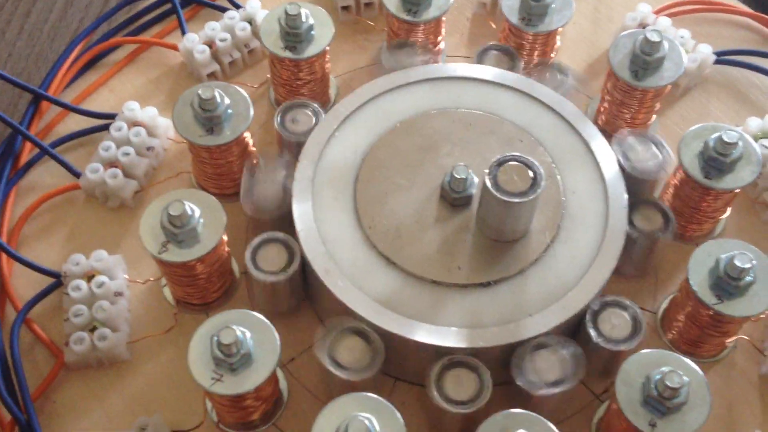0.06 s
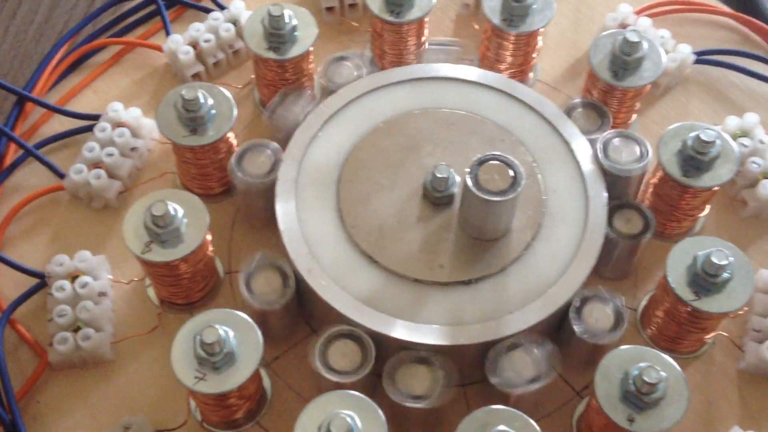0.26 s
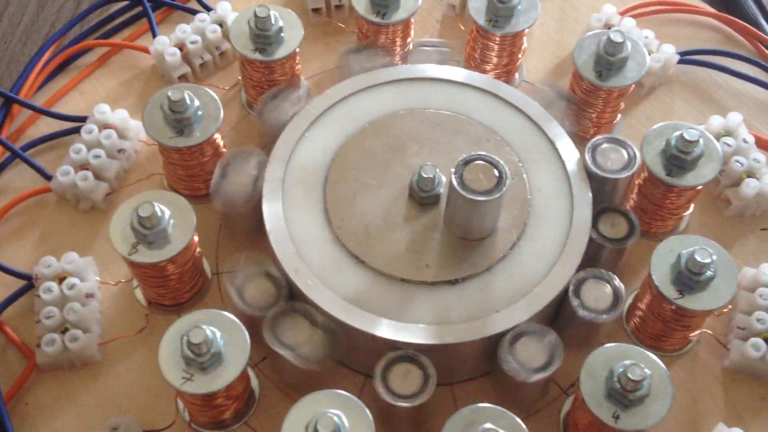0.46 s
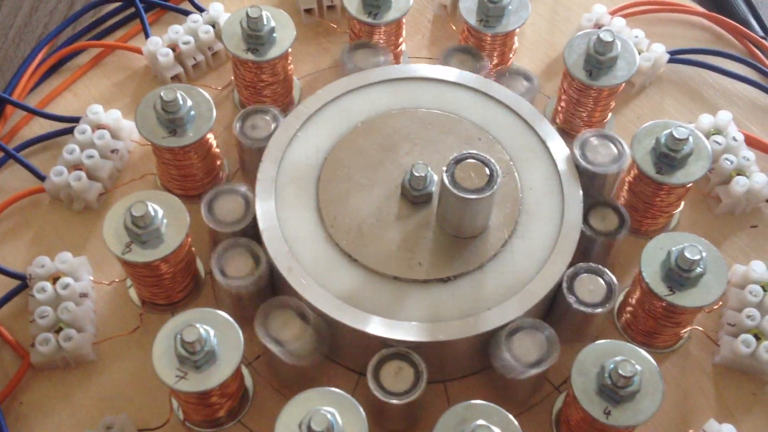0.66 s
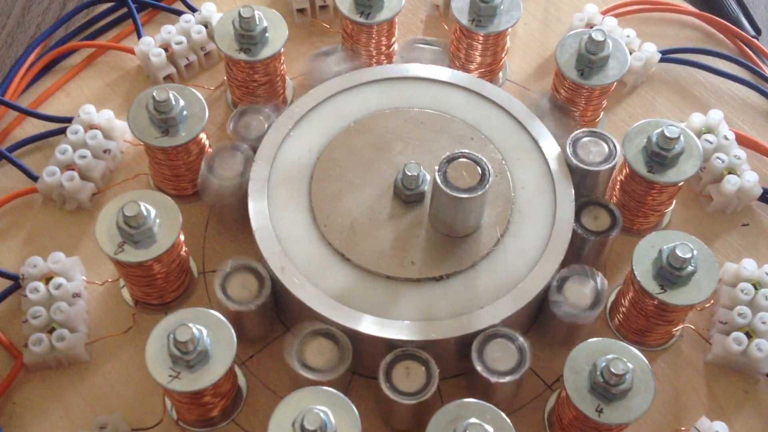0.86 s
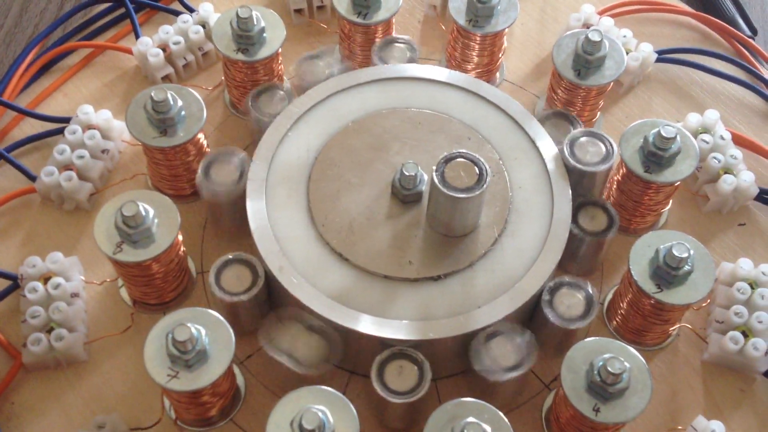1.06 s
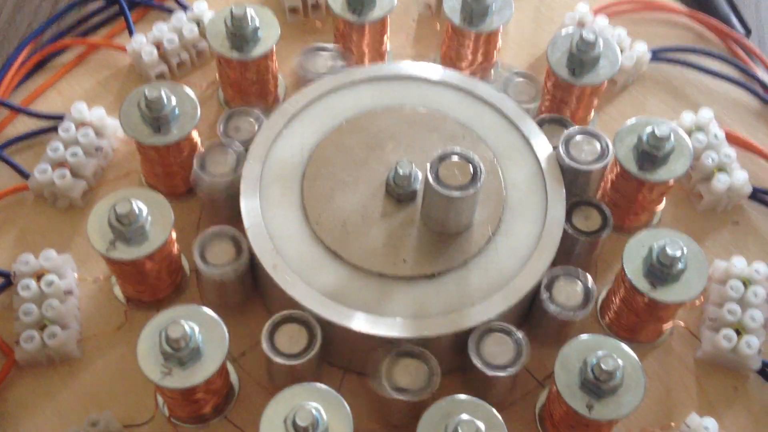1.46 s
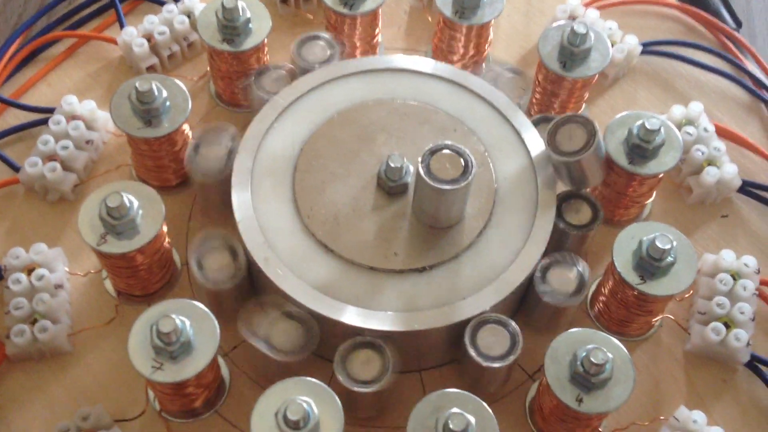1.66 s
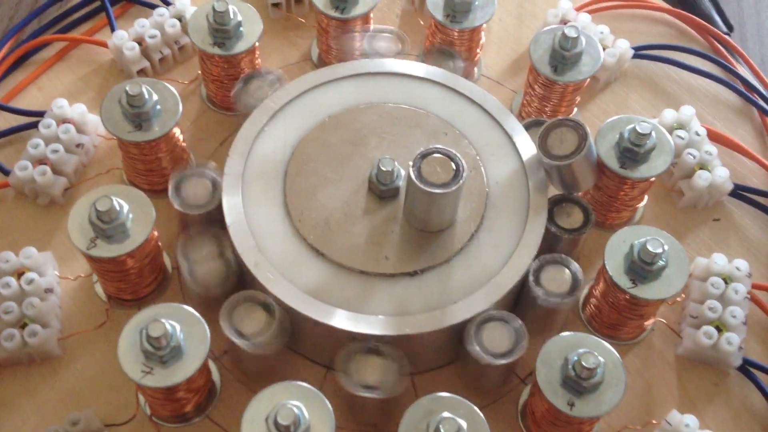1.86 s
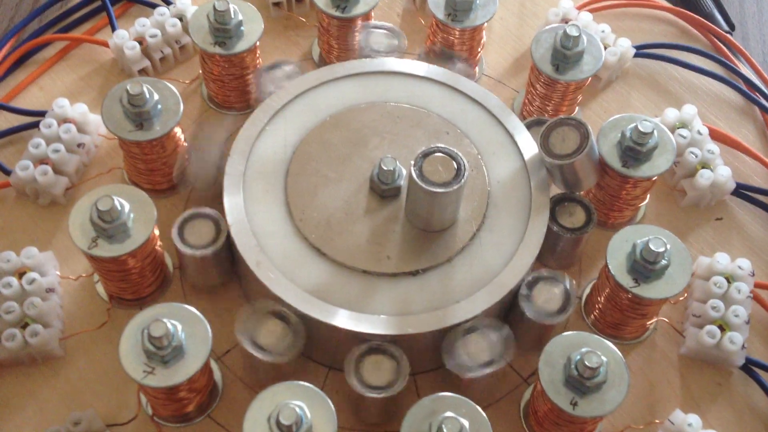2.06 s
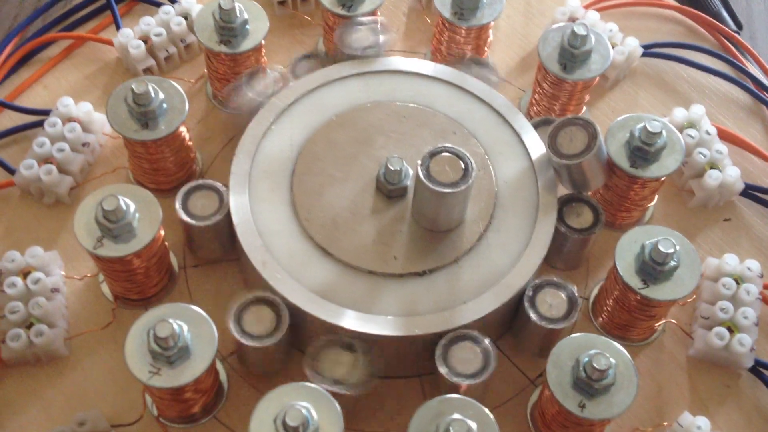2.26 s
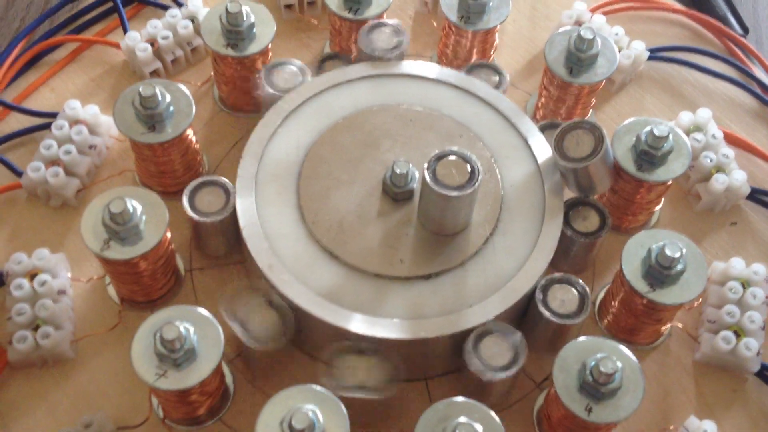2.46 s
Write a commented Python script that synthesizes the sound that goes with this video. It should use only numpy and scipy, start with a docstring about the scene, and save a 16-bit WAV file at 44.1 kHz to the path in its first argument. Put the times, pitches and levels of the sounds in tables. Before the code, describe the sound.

Small steel rollers click and rattle rapidly around a metal disc over a faint hum.

```python
"""Magnetic steel rollers run around a metal disc on a wooden table, close to the microphone.
They snap against the disc and each other in short bright clicks with a chatter of micro-bounces,
now and then knock the board, and rumble and hiss as they roll. A small live room answers every click.
Underneath, a faint hum comes and goes, and a soft low rumble swells near the end."""
import sys
import numpy as np
from scipy import signal
from scipy.fft import rfft, irfft
from scipy.io import wavfile
from scipy.ndimage import uniform_filter1d

SR = 44100
rng = np.random.default_rng(int(sys.argv[2]) if len(sys.argv) > 2 else 0)


def bounce(signal):
    """Save signal as a 16-bit WAV file at the path given by the first command-line argument."""
    frames = np.transpose(np.atleast_2d(signal))
    limited = np.clip(frames, -1, 1)
    pcm = np.round(limited * 32767).astype(np.int16)
    wavfile.write(sys.argv[1], SR, pcm)


N = 114660

SNAP_HZ, CLACK_HZ = 6374, 3565  # pitches at which the roller modes are listed


def rollers():
    """Each roller grazes, then strikes; faint ticks fall between. Gives direct sound and room send."""
    # strikes: t/s, snap level/dB, knock, clack and ping re snap/dB, snap f/Hz, clack f/Hz
    clicks = [(0.0172, -14.5, -5.5, 0, -24, 7650, 3820), (0.0197, -20.5, -12, 6, -11, 6200, 4050),
              (0.0244, -17.5, -5, -2, -11, 6600, 3860), (0.1128, -31, 4, 3, -14, 6400, 3500),
              (0.1551, -29, -4, 7.5, -3, 5400, 3970), (0.248, -7, -10.5, -1, -12, 6250, 3840),
              (0.3215, -30, 0, 2, -14, 6400, 3500), (0.3445, -30, 1, 1, -16, 6400, 3500),
              (0.3992, -2, -14, -4, -11.5, 5950, 3560), (0.476, -9.5, -14.5, -4.5, -16, 7000, 4260),
              (0.5488, -0.5, -36, -5, -24, 6100, 3390), (0.5534, 4, -32, -15, -30, 6240, 4680),
              (0.627, -6, -16.5, -8, -39, 6900, 4220), (0.7035, 0.5, -21, -8, -26, 6280, 3540),
              (0.7859, -5.5, -19, -9.5, -39, 6870, 4000), (0.8596, 4, -20, -11.5, -7.5, 6200, 3610),
              (0.9437, -8, -7.5, -6.5, -22, 6970, 4350), (1.0212, 3, -15, -8, -14, 6240, 3330),
              (1.097, -12, -10, -6, -20, 7000, 3800), (1.177, 3, -22, -6, -14.5, 6230, 3480),
              (1.2447, -15.5, -27, -6, -10, 5600, 2800), (1.3366, 0, -9.5, -6.5, -4.5, 6170, 4050),
              (1.3935, -15.5, 0, -2, -2.5, 5860, 3400), (1.4396, 1.5, -23, -7.5, -42, 6620, 4300),
              (1.5239, -23, 7.5, 6, -8, 6000, 3700), (1.5764, -18.5, -7, -3, -7, 6200, 3620),
              (1.5886, -16, -4, -1, 7, 5700, 4450), (1.6023, 2, -30, -2.5, -0.5, 6080, 3670),
              (1.607, -6.5, 4, -11, -18, 5400, 3060), (1.711, -29, 2, 3, -14, 6400, 3500),
              (1.7609, 1, -14, -5, -3, 6590, 4010), (1.8612, -7, -17, -1.5, -28, 7000, 4310),
              (1.9164, -5.5, -17, -4.5, -7, 7000, 4030), (1.919, -7, -4.5, -5.5, -12, 6750, 4580),
              (2.0124, -1.5, -16, -3, -22, 7070, 4440), (2.0768, -8.5, -12, -4, -26, 6940, 3760),
              (2.0803, -13.5, -5, -0.5, -25, 6300, 4120), (2.1416, -6, -16.5, -4, -12, 7300, 4730),
              (2.144, -8.5, -14, -3, -15, 7530, 4600), (2.174, -8.5, -9, 3, -1.5, 7080, 4340),
              (2.3214, -1.5, -18, -6, -22, 6670, 4060), (2.556, -33, 3, 2, -12, 6400, 3500)]
    graze_lead_s, graze_db, ticks_per_s, low_cut_hz = 0.0014, -10, 20, 895
    shaded_share = 0.11  # the disc partly hides quiet strikes: this share of their loss spares the room
    direct, send, ticks = np.zeros((3, N))
    for start, db, *tone in clicks:
        hit = strike(db, *tone)
        add(direct, start, chatter(hit))
        add(direct, start - graze_lead_s, chatter(strike(db + graze_db, *tone)))
        add(send, start, all_round(hit) * undb(-shaded_share * db))
    for start in rng.uniform(0, N / SR, int(ticks_per_s * N / SR)):
        db = -37 + 2.5 * np.clip(rng.standard_normal(), -2, 1)
        add(ticks, start, strike(db, knock_db=3, clack_db=2, ping_db=-16))
    # small parts radiate no bass
    return high_pass(direct + ticks, low_cut_hz), high_pass(send + ticks, low_cut_hz)


def strike(snap_db, knock_db, clack_db, ping_db, snap_hz=SNAP_HZ, clack_hz=CLACK_HZ):
    """One steel contact: heavily damped modes and a bright crack of noise."""
    # roller modes: f/Hz, t60/ms, level/dB, part (rounds to 0 snap, 1 knock, 2 clack, -1 ping)
    modes = [(5848, 2.73, -8, 0.48), (6460, 2.1, -3.5, -1), (7040, 2.06, -8, 0.5), (1134, 26.3, 0, 1),
             (1648, 24.8, 2, 1), (2650, 2.9, -2.5, 2), (3483, 3.07, 2, 2), (4100, 5.2, -12, 2)]
    # trim of snap, knock, clack and ping: level/dB
    trim_db = [-0.61, 0.41, 1, -1.8]
    steel_ping = (14780, 3.8, 0, -1)  # the high mode of the steel itself
    contact_ms, detune_hz, crack_db, crack_t60_ms = 0.22, 62, -15, 8
    ms = np.arange(SR // 40) * 1000 / SR
    attack = 1 - np.exp(-(ms / contact_ms) ** 2)
    parts = np.zeros((4, len(ms)))
    pitch = [snap_hz / SNAP_HZ, 1, clack_hz / CLACK_HZ, 1]
    for hz, t60, db, part in modes + [steel_ping]:
        part = round(part)
        detune, phase = rng.standard_normal(2)
        hz = (hz + detune_hz * detune) * pitch[part]  # rollers differ in pitch
        wave = np.sin(2 * np.pi * (hz * ms / 1000 + phase))
        parts[part] += undb(db) * wave * fade(ms, t60) * attack
    gains = undb(np.array([0, knock_db, clack_db, ping_db]) + trim_db)
    ring = sum(gain * unit(part) for gain, part in zip(gains, parts))
    bright_noise = np.diff(rng.standard_normal(len(ms) + 1)) + rng.standard_normal(len(ms))
    crack = unit(bright_noise * attack * fade(ms, crack_t60_ms))
    return undb(snap_db) * (ring + undb(crack_db) * crack)


def chatter(hit, bounce_db=-9, t60_ms=16.8):
    """A strike followed by its micro-bounces."""
    ms = np.arange(len(hit)) * 1000 / SR
    bounces = unit(rng.standard_normal(len(ms)) * fade(ms, t60_ms) * (ms > .5))
    return hit + undb(bounce_db) * signal.fftconvolve(hit, bounces)[:len(ms)]


def all_round(hit, smooth_hz=1300):
    """What a strike radiates in all directions: the same colour with its narrow peaks evened out."""
    power = uniform_filter1d(np.abs(rfft(hit)) ** 2, int(smooth_hz * len(hit) / SR))
    return np.roll(irfft(np.sqrt(np.abs(power)), len(hit)), SR // 500)


def board_ring():
    """Disc and board answer an impulse with short woody modes, thin in the bass."""
    # modes of disc and board: f/Hz, t60/ms, level/dB
    modes = [(393, 91, -20), (695, 10, -22), (747, 115, 0), (781, 59, -6), (861, 45, -8), (1126, 82, -21),
             (1241, 49, -13), (1425, 35, -23), (1660, 93, -17), (2020, 38, -26), (2590, 55, -20)]
    t = np.arange(SR // 8) / SR
    ring = sum(undb(db) * np.sin(2 * np.pi * hz * t) * fade(t, t60 / 1000) for hz, t60, db in modes)
    return unit(high_pass(ring, hz=660))


def knocks(body):
    """A roller bumps the board with a dull thump, stays pressed on and damps the ring."""
    # bumps on the board: t/s, level/dB
    bumps = [(.112, -21), (1.338, -12), (1.3965, -11.5), (1.520, -10), (1.5755, -6), (1.5885, -28),
             (1.5915, -1.5), (1.607, -4.5), (2.342, -16.5)]
    thump_hz, thump_db = 354, -28
    t = np.arange(len(body)) / SR
    damped = unit(body * fade(t, t60=0.21))
    low_pass = signal.butter(2, thump_hz, fs=SR, output="sos")
    out = np.zeros(N)
    for start, db in bumps:
        thump = signal.sosfilt(low_pass, rng.standard_normal(len(t)) * fade(t, t60=0.02))
        add(out, start, undb(db) * (damped + undb(thump_db) * unit(thump)))
    return out


def rolling(body):
    """The grain of the track rings disc and board in surges; steel hisses on steel."""
    # rolling envelope: t/s, relative level/dB
    envelope = [(0, 3.5), (.1, -0.5), (.12, 2), (.2, 1.5), (.3, 0), (.6, 0.5), (1.0, 3), (1.45, 0),
                (1.8, 2.5), (2.25, -2), (2.36, -1), (2.44, -4), (2.55, -2), (2.6, -8.5)]
    # spectrum of the hiss: f/Hz, relative level/dB
    scrape = [(200, -57), (560, -62), (900, 1.5), (1300, 5.5), (2000, 4), (3000, 2), (4500, -10),
              (7000, -9.5), (9500, -17), (15000, -35)]
    grains_per_s, grain_spread_db, surge_db = 1500, 5, 2
    effort = curve(envelope) * undb(surge_db * walk(21.86))
    impulses = (rng.random(N) < grains_per_s / SR) * rng.choice([-1, 1], N)
    grains = impulses * undb(grain_spread_db * rng.standard_normal(N)) * effort
    roll = level(signal.fftconvolve(grains, body)[:N], db=-50)
    hiss = level(grains, db=-12.5) + rng.standard_normal(N) * effort
    return roll + level(colour(hiss, scrape), db=-54.5)


def room(send):
    """A few distinct reflections and a diffuse tail that changes as the rollers move."""
    # reverb bands: centre f/Hz, t60/s, level/dB
    reverb = [(292, 0.17, -6.5), (810, 0.28, -9), (2050, 1, -14.5), (4650, 0.49, -10), (7000, 0.54, -14),
              (11300, 0.3, -8.5), (15100, 0.39, -21.5)]
    # distinct reflections: delay t/s, level/dB
    reflections = [(.007, -24.5), (.009, -27), (.0137, -29), (.0655, -30)]
    predelay_s, path_change_s = 0.00317, 0.15
    t = np.arange(SR // 2) / SR
    f = np.fft.rfftfreq(N, 1 / SR)
    noise, centres = rfft(rng.standard_normal(N)), [row[0] for row in reverb]
    bands = np.array([irfft(noise * np.interp(f, centres, share), N) for share in np.eye(len(reverb))])
    decays = np.array([undb(db) * unit(fade(t, t60) * (t > predelay_s)) for _, t60, db in reverb])
    out, step = np.zeros(N), int(path_change_s * SR)
    for start in range(0, N, step):
        i = rng.integers(N - len(t))
        tail = np.sum(bands[:, i:i + len(t)] * decays, axis=0)
        add(out, start / SR, signal.fftconvolve(send[start:start + step], tail))
    for delay, db in reflections:
        add(out, delay, undb(db) * send)
    return out


def hum():
    """Three low tones hold while a fourth swells and recedes."""
    # held tones: f/Hz, level/dB
    tones = [(135, -81), (195, -78.5), (366, -76.5)]
    # envelope of the swelling tone: t/s, level/dB
    swell = [(0, -92), (.74, -78), (.8, -69.5), (1.2, -68), (1.62, -66), (1.68, -79.5), (2.6, -75.5)]
    held = sum(undb(db) * hum_tone(hz) for hz, db in tones)
    return held + curve(swell) * hum_tone(hz=247.8)


def hum_tone(hz, waver_hz=2.39, waver_db=1.5):
    """A sine that wavers in pitch and level."""
    phase = 2 * np.pi * np.cumsum(hz + waver_hz * walk(12.16)) / SR
    return np.sqrt(2) * np.sin(phase) * undb(waver_db * walk(14.3))


def air():
    """Room tone: the faint, even noise of still air."""
    # room tone spectrum: f/Hz, relative level/dB
    spectrum = [(25, -20), (75, -19), (130, -2), (200, -3.5), (340, 1), (520, -5), (1000, -16),
                (4000, -3.5), (15000, -49)]
    return level(colour(rng.standard_normal(N), spectrum), db=-64)


def rumble():
    """A soft low rumble swells near the end and eases off."""
    # rumble envelope: t/s, level/dB
    envelope = [(2.38, -89), (2.51, -64.5), (2.6, -68)]
    # rumble spectrum: f/Hz, relative level/dB
    spectrum = [(150, -26), (240, 1), (285, 0), (420, -7), (1000, -60)]
    return curve(envelope) * level(colour(rng.standard_normal(N), spectrum), db=0)


def undb(db):
    """Decibels to gain."""
    return 10 ** (np.asarray(db) / 20)


def level(x, db):
    """Set the rms level."""
    return x * undb(db) / np.sqrt(np.mean(x ** 2))


def unit(x):
    """Scale to unit energy."""
    return x / np.sqrt(np.sum(x ** 2))


def fade(t, t60):
    """Exponential decay, 60 dB down at t60."""
    return np.exp(-np.log(1000) * t / t60)


def curve(rows):
    """Gain envelope from rows of t/s, level/dB."""
    return undb(np.interp(np.arange(N) / SR, *np.array(rows).T))


def colour(x, points):
    """Equalise by points of f/Hz, level/dB."""
    hz, db = np.array(points).T
    f = np.maximum(np.fft.rfftfreq(len(x), 1 / SR), 1)
    return irfft(rfft(x) * undb(np.interp(np.log(f), np.log(hz), db)), len(x))


def high_pass(x, hz):
    """Steep bass cut."""
    return signal.sosfilt(signal.butter(4, hz, "high", fs=SR, output="sos"), x)


def walk(rate_hz):
    """Smooth random wander with spread 1."""
    hold = int(SR / rate_hz)
    steps = np.repeat(rng.standard_normal(N // hold + 1), hold)
    wander = uniform_filter1d(uniform_filter1d(steps, hold), hold)[:N]
    return wander / wander.std()


def add(out, start_s, sound):
    """Mix a sound in at a time."""
    i = max(int(start_s * SR), 0)
    out[i:i + len(sound)] += sound[:max(N - i, 0)]


def scene():
    """Rollers and board in the room, over a bed of hum, air and rumble."""
    background = hum() + air() + rumble()
    body = board_ring()
    board = knocks(body) + rolling(body)
    direct, send = rollers()
    return (direct + board + room(send + board) + background)[None]


def record(dry, top_hz=15400):
    """The microphone scoops the low mids and lifts the high treble; the recorder cuts the top."""
    # microphone response: f/Hz, level/dB
    microphone = [(30, -3), (110, 1), (420, 4), (530, -11), (700, -1), (7600, 0.5), (8500, 0), (9400, -0.5),
                  (11000, 2.5), (13000, 2)]
    coloured = colour(dry[0], microphone)[None]
    return signal.sosfilt(signal.ellip(8, .2, 70, top_hz, fs=SR, output="sos"), coloured)


dry = scene()
out = record(dry)
bounce(out)
```